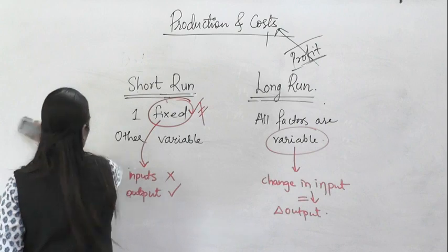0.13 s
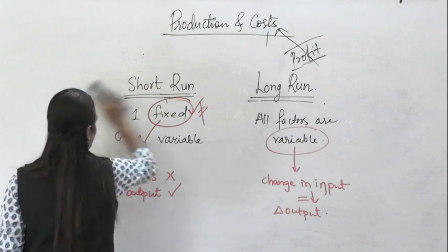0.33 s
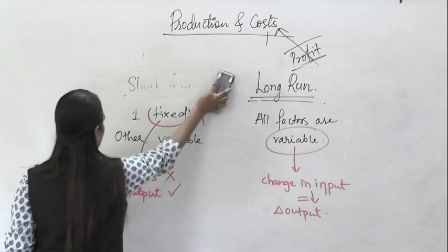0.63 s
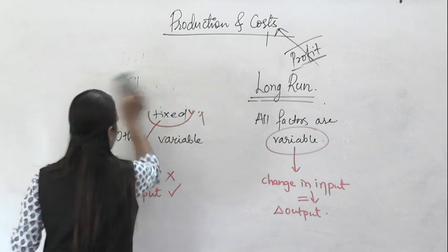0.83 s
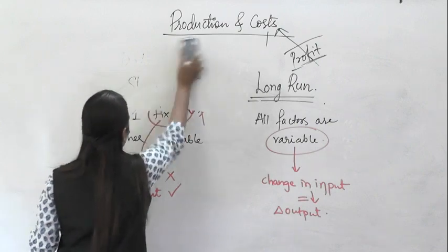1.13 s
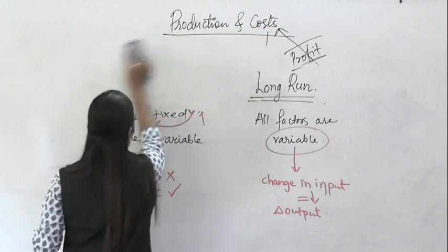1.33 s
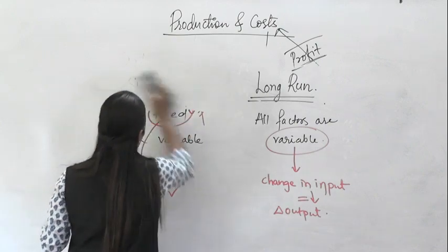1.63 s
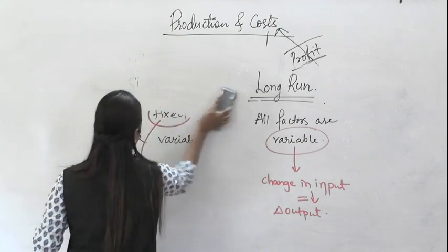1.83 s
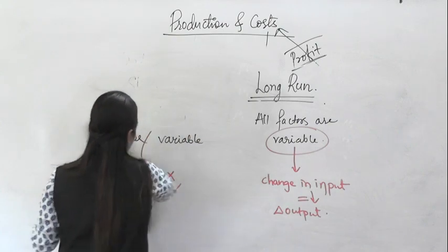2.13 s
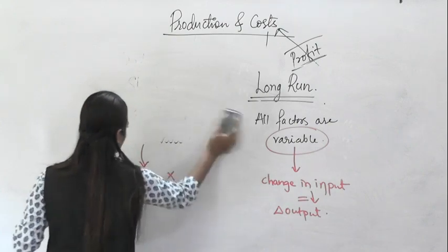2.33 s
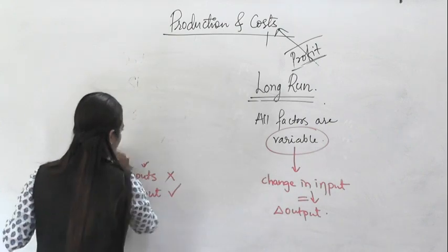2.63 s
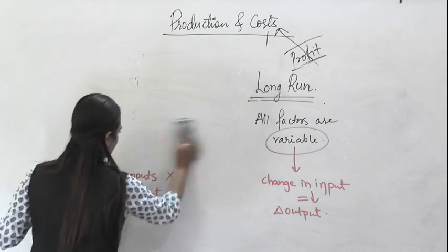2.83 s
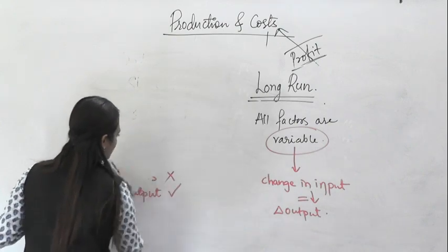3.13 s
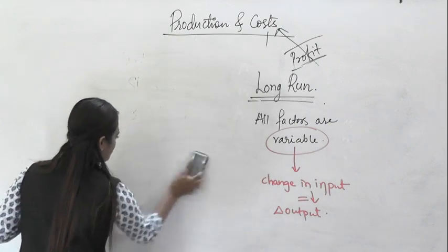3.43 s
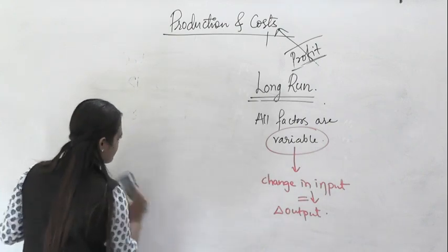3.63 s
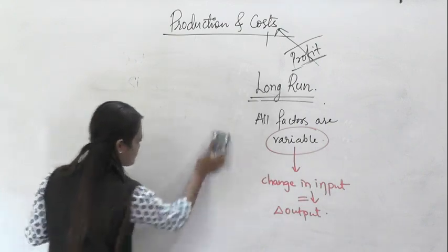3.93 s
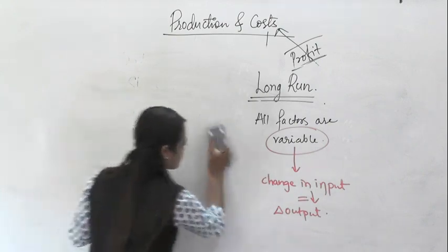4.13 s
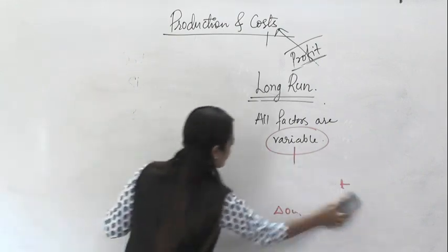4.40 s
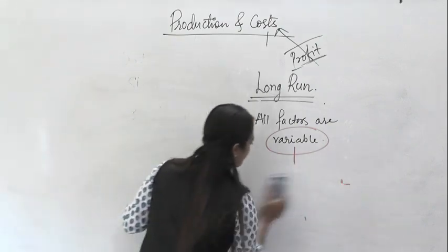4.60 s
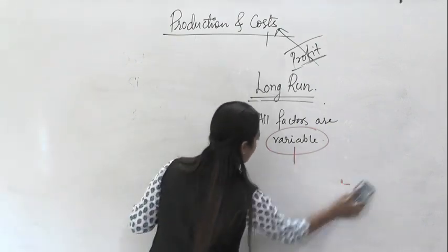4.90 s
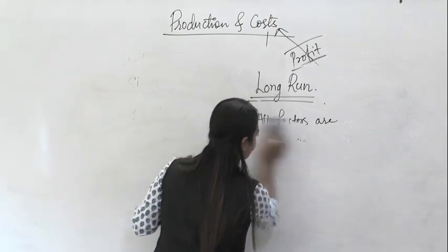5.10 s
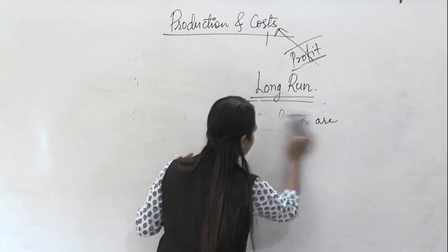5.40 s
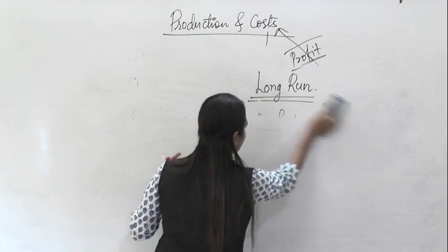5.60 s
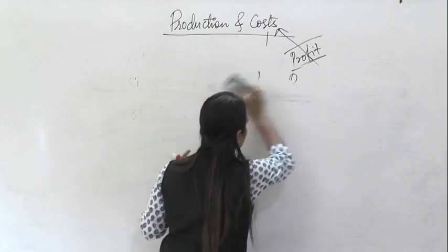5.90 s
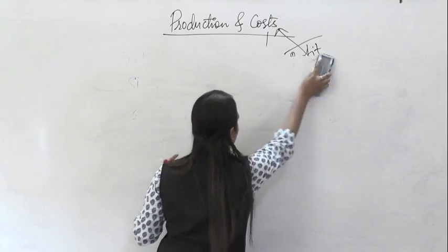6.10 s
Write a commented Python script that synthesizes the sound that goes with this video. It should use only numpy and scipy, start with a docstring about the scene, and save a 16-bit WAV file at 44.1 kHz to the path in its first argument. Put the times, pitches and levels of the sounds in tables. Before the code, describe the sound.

A handheld felt duster rubs a whiteboard in quick, uneven strokes, each a grainy hiss swelling and fading. Early sweeps are broad and airy; later ones become shorter and more hollow, with stronger body resonance, then lighten again. Tiny edge ticks, soft low arm thuds and sleeve rustle come between. A close microphone in a quiet classroom catches a faint room tail; the sound sits almost entirely on the left, with only a dull leak, hiss and faint hum on the right.

```python
"""A felt duster sweeps back and forth over a whiteboard in a quiet classroom, close to a single microphone.
Each stroke is grainy noise shaped by resonances of felt, duster and board that swell and fade with the arm.
Short pitched bursts make the edge's ticks and low swings the arm's soft thuds; a sleeve rustles and rumbles.
A faint room tail and air noise lie behind. The microphone feeds the left input only;
the right input holds a faint dull leak, its own hiss and mains hum."""
import sys
import numpy as np
from scipy import signal
from scipy.fft import rfft, irfft, next_fast_len
from scipy.io import wavfile
from scipy.ndimage import uniform_filter1d, map_coordinates

SR = 44100
rng = np.random.default_rng(int(sys.argv[2]) if len(sys.argv) > 2 else 0)


def voltage_ratio(level):
    """Linear amplitude factor for a level in decibels (scalar or array-like)."""
    return 10 ** (np.asarray(level, float) / 20)


def digitize_waveform(pressure):
    """Quantize a signal to 16-bit integers and store it at the path in sys.argv[1].

    Rows of a 2-D input are taken as channels; values are limited to [-1, 1].
    """
    field = np.atleast_2d(pressure).T
    bounded = np.clip(field, -1, 1)
    quanta = np.round(bounded * 32767).astype(np.int16)
    wavfile.write(sys.argv[1], SR, quanta)


N = 275713  # length in samples


def unit(x):
    """Scaled to rms 1."""
    return x / np.sqrt(np.mean(x ** 2) + 1e-20)


def along(points, hz):
    """Reads (Hz, value) points on a logarithmic frequency axis."""
    f, v = np.transpose(points)
    return np.interp(np.log(hz + 1), np.log(f + 1), v)


def curves(rows, t):
    """Reads each column after the time at times t, in straight lines between rows."""
    s, *cols = np.transpose(rows)
    return [np.interp(t, s, c) for c in cols]


def moments(rows, t, length_s):
    """A short bell at each row's time (rows by times), and the other columns."""
    s, *cols = np.transpose(rows)
    return np.exp(-((t - s[:, None]) / length_s) ** 2), cols


def wobble(rate):
    """A smooth random curve with rate knots a second."""
    knots = rng.standard_normal(int(N * rate / SR) + 4)
    return map_coordinates(knots, [np.arange(N) * rate / SR])


def filtered(x, response):
    """Filters x by a complex response of frequency."""
    m = next_fast_len(N + SR // 2)
    return irfft(rfft(x, m) * response(np.fft.rfftfreq(m, 1 / SR)), m)[..., :N]


def coloured(spectrum):
    """Noise of rms 1 whose spectrum has the given shape."""
    closed = [(1, -120)] + list(spectrum) + [(SR / 2, -120)]
    return unit(filtered(rng.standard_normal(N), lambda hz: voltage_ratio(along(closed, hz))))


def resonance(f, hz, width_hz, steep):
    """Power of a resonance along f, averaging 1; steep sharpens its skirts."""
    power = (1 + ((f * f - hz * hz) / ((f + 1) * width_hz)) ** 2) ** -steep
    return power / np.mean(power, axis=0)


def smooth_noise(shape, bands, frames):
    """Random values smoothed over neighbouring frequency bands and time frames, rms 1."""
    x = uniform_filter1d(rng.standard_normal(shape), size=bands, axis=0)
    return unit(uniform_filter1d(x, size=frames, axis=1))


def rubbing(grit_db=1.0, patchy_db=1.82, ridge_db=0.98):
    """Fibres catch and slip in dense grains; the grains ring five resonances that follow the strokes."""
    grains = unit(rng.standard_normal(N) * voltage_ratio(grit_db * wobble(400) + 0.95 * wobble(45)))
    f, t, z = signal.stft(grains, SR, nperseg=256, noverlap=192)
    f = f[:, None]
    power = felt(f, t) + duster_and_board(f, t)
    # uneven felt and ink: patches of colour come and go
    patches_db = patchy_db * smooth_noise(z.shape, bands=3, frames=40)
    # narrow ridges of resonance last through part of a stroke
    ridges_db = ridge_db * smooth_noise(z.shape, bands=2, frames=120)
    gain = voltage_ratio(ridges_db + patches_db + close_reflection(f, t) + brief_shifts(t)) * np.sqrt(power)
    rubbed = signal.istft(z * gain, SR, nperseg=256, noverlap=192)[1][:N]
    return rubbed * voltage_ratio(catching(np.arange(N) / SR))


# The pushes of the arm. Each row: fastest moment in seconds, rise in seconds, fall in seconds,
# felt hiss level in dB, duster body level in dB.
STROKES = [(0.01, 0.041, 0.15, -36.5, -41.5), (0.258, 0.043, 0.43, -39, -47.5),
           (0.498, 0.32, 0.17, -33.5, -37.5), (0.908, 0.111, 0.091, -33, -35),
           (1.16, 0.26, 0.11, -37.5, -43.5), (1.432, 0.057, 0.13, -29.5, -43),
           (1.735, 0.37, 0.11, -38.5, -42), (2.04, 0.088, 0.11, -25.5, -27.5),
           (2.333, 0.64, 0.12, -41.2, -40.5), (2.652, 0.085, 0.077, -34, -28.5),
           (2.868, 0.12, 0.11, -41, -38.5), (3.155, 0.072, 0.089, -36.5, -27.5),
           (3.388, 0.3, 0.094, -50.5, -40), (3.617, 0.064, 0.073, -41, -31.5),
           (3.859, 0.14, 0.15, -46.5, -38), (4.362, 0.12, 0.16, -39, -43.5),
           (4.585, 0.037, 0.209, -34.5, -34.5), (4.688, 0.09, 0.044, -35, -24.5),
           (4.865, 0.11, 0.13, -34, -37.5), (5.213, 0.13, 0.09, -39.5, -43.5),
           (5.496, 0.22, 0.11, -47, -51.5), (5.782, 0.12, 0.113, -41, -48), (5.97, 0.044, 0.24, -46, -49)]


def stroking(t, peak_db, swing):
    """Power over time: every stroke swells to its peak and dies away, more steeply with a larger swing."""
    roundness = 1.656  # with swing 1 the level is 20 dB down one rise before or one fall after the peak
    s, rise, fall = np.transpose(STROKES)[:3, :, None]
    away = np.where(t < s, (s - t) / rise, (t - s) / fall) ** roundness
    return np.sum(voltage_ratio(2 * (peak_db[:, None] - 20 * swing * away)), axis=0)


# The felt's colour drifts with place and tilt. Each row: time in seconds, hiss centre in Hz,
# fibre sizzle centre in Hz, sizzle level in dB relative to the hiss.
FELT = [(0, 5700, 9800, -17), (.5, 5460, 10000, -13), (.75, 5600, 9800, -6), (.9, 6100, 9800, -16),
        (1.16, 5970, 9800, -9), (1.32, 5970, 9900, -6), (1.44, 5500, 10300, -17), (1.72, 6140, 10300, -9),
        (2.04, 5330, 9500, -17), (2.17, 5300, 9500, -12), (2.33, 5860, 10000, -1.5),
        (2.65, 5800, 10000, -11), (2.87, 5300, 10100, -3.5), (3.16, 5600, 9400, -5.5),
        (3.26, 5400, 9800, 4), (3.36, 7540, 9900, 9.5), (3.47, 5600, 9800, 1), (3.62, 6200, 9600, -1),
        (3.7, 7400, 9400, 13), (3.77, 7600, 9300, 16), (3.86, 7100, 8800, 3), (4, 6500, 10000, 5),
        (4.36, 6160, 9600, -2.5), (4.58, 5870, 10400, -14), (4.66, 6200, 10300, -24),
        (4.76, 5900, 11500, -6), (4.87, 6250, 12300, -15), (5.21, 6560, 9400, -5), (5.3, 5840, 9800, -8),
        (5.4, 7050, 9800, 2.5), (5.52, 6960, 9800, -7.5), (5.66, 5840, 9800, -4), (5.78, 5800, 9600, -11),
        (6.25, 5400, 9900, -10)]


def felt(f, t):
    """Rubbed felt gives a broad hiss and a higher, wider fibre sizzle, as power by frequency and time."""
    hiss_peak_db = np.transpose(STROKES)[3]
    hiss_hz, sizzle_hz, sizzle_db = curves(FELT, t)
    hiss = stroking(t, hiss_peak_db, swing=1) * resonance(f, hiss_hz, width_hz=3940, steep=2.64)
    sizzle = voltage_ratio(2 * sizzle_db) * stroking(t, hiss_peak_db, swing=1.19)
    return hiss + sizzle * resonance(f, sizzle_hz, width_hz=8600, steep=2.8)


# Grip and pressure detune the duster. Each row: time in seconds, body pitch in Hz, body width
# as a multiple of the usual width, upper mode pitch in Hz, upper mode level in dB relative
# to the hiss, board level in dB.
BODY = [(0, 2300, 1.2, 3900, 2.5, -47.5), (.28, 2200, 1.3, 3600, -4, -49.5),
        (.52, 2100, 1.76, 3900, -29, -49), (.73, 1970, 1.2, 3700, -13, -48.5),
        (.91, 2060, 0.73, 4240, -3.5, -45.5), (1.16, 2470, 2.6, 3650, -16, -44),
        (1.31, 2060, 2.8, 3480, -3, -47.5), (1.44, 2300, 1.4, 3670, -3.5, -40.5),
        (1.72, 2520, 2.3, 3720, -6.5, -45.5), (2.04, 2400, 0.41, 3790, 7.5, -45),
        (2.33, 2330, 2, 3800, -2, -43), (2.65, 2210, 0.81, 4000, 0, -46),
        (2.87, 2180, 1.14, 3440, -0.5, -45), (3.16, 2160, 0.77, 4300, 0, -44),
        (3.27, 2160, 0.7, 3500, 2, -45.5), (3.39, 2180, 0.62, 3380, 9.5, -39),
        (3.62, 2210, .72, 3200, -2.5, -41.5), (3.74, 2000, 0.87, 3100, 2, -44.5),
        (3.9, 2290, 1.24, 3300, -12, -45.5), (4.09, 2350, 1.5, 3500, 15.5, -38),
        (4.22, 2000, 1.9, 3650, -7, -39), (4.36, 2260, 1.5, 4000, -4, -43),
        (4.66, 2180, 0.82, 3800, -4, -41), (4.87, 2210, 0.97, 4240, -17.5, -51),
        (5.05, 2190, 2.7, 3820, 5.5, -49), (5.2, 2440, 1.1, 4070, -4.5, -43),
        (5.35, 2250, 0.82, 3960, 2, -43.5), (5.5, 2390, 0.41, 3700, 5, -40),
        (5.63, 2500, 1.3, 3480, 10.5, -44.5), (5.78, 2460, 0.64, 4050, -4, -47.5),
        (6.0, 2350, 2.2, 3640, 0.5, -41), (6.25, 2100, 1.1, 3500, -0.5, -44)]
# The board's steady resonance: pitch in Hz, width in Hz.
BOARD = (1383, 910)
# The hand bears down for a moment, so body and board ring louder. Each row: time in seconds,
# added body level in dB, added board level in dB.
PRESSES = [(.36, -59, -45.5), (.46, -49, -45.5), (.9, -42, -50), (1.44, -30, -65), (1.63, -57, -40),
           (1.92, -48, -40.5), (2.05, -30, -47), (2.14, -57, -40), (2.4, -39.5, -57), (2.93, -41.5, -57),
           (3.199, -29.5, -64), (3.42, -38, -56), (3.62, -29.5, -46), (3.97, -39, -46.5),
           (4.08, -48.5, -64), (4.27, -68, -48), (4.37, -36.5, -41), (4.68, -31, -37), (4.89, -36.5, -37),
           (5.14, -39, -47), (5.2, -40, -42), (5.481, -37.5, -44), (5.77, -42.5, -52), (5.98, -60, -48)]


def duster_and_board(f, t):
    """The duster's body, its upper mode and the board ring at their pitches, as power by frequency and time."""
    usual_width_hz, press_s = 1056, 0.028
    board_follows = 0.29  # share of the body's stroke-to-stroke level differences that reaches the board
    hiss_peak_db, body_peak_db = np.transpose(STROKES)[3:]
    body_hz, width, upper_hz, upper_db, board_db = curves(BODY, t)
    press, (press_body_db, press_board_db) = moments(PRESSES, t, press_s)
    body = stroking(t, body_peak_db, swing=0.68) + voltage_ratio(2 * press_body_db) @ press
    board_peak_db = board_follows * (body_peak_db - body_peak_db.mean())
    board = voltage_ratio(2 * board_db) * stroking(t, board_peak_db, swing=0.34)
    board = board + voltage_ratio(2 * press_board_db) @ press
    upper = voltage_ratio(2 * upper_db) * stroking(t, hiss_peak_db, swing=0.8)
    return (body * resonance(f, body_hz, width * usual_width_hz, steep=2.75)
            + board * resonance(f, *BOARD, steep=3.6)
            + upper * resonance(f, upper_hz, width_hz=2980, steep=3.1))


# A close reflection colours the rubbing. Each row: time in seconds, pitch of the change in Hz,
# level change there in dB (below zero hollows out, above zero lifts).
REFLECTION = [(0, 3020, -7), (.3, 3830, -1.5), (.6, 3770, 1), (.73, 3800, -5), (.85, 3730, -1),
              (1.2, 4200, 0), (1.32, 4500, -6), (1.42, 3820, -2), (1.7, 3900, -5), (2.05, 4060, -0.5),
              (3.15, 3950, 0), (3.3, 4080, -11), (3.45, 4200, -1), (3.62, 4000, -3), (3.72, 4250, -16),
              (3.85, 4400, -13), (4.02, 5400, -5), (4.2, 5000, 4), (4.37, 3150, -5.5), (4.6, 3000, -5.5),
              (4.7, 3060, -7), (4.8, 3150, -20), (4.95, 3130, -10), (5.0, 2600, -2), (5.06, 2350, -12),
              (5.13, 2360, -1), (5.35, 2080, -3), (5.63, 1970, -2), (5.78, 1960, 1), (6.25, 2100, -14)]


def close_reflection(f, t):
    """A close reflection hollows or lifts the rubbing around one pitch, and less near three times that pitch."""
    centre_hz, change_db = curves(REFLECTION, t)
    lower = np.exp(-((f - centre_hz) / (0.093 * centre_hz)) ** 2)
    upper = np.exp(-((f - 3.14 * centre_hz) / (0.28 * centre_hz)) ** 2)
    return change_db * (lower + 0.48 * upper)


# Brief shifts in level between strokes. Each row: time in seconds, level change in dB
# (below zero is quieter).
SHIFTS = [(.18, -0.5), (.75, 2), (1.0, 0), (1.32, -0.5), (1.87, -3.5), (2.2, -3), (2.5, 9.5), (3.52, 2),
          (5.05, 4.5), (5.35, -2.5), (5.62, 1)]


def brief_shifts(t):
    """Level change in dB: the rubbing dips or lifts briefly at some listed moments between strokes."""
    shift, (change_db,) = moments(SHIFTS, t, length_s=0.015)
    return change_db @ shift


# The felt sticks, then breaks free. Each row: time in seconds, jump in level in dB
# (below zero the level falls instead).
CATCHES = [(1.412, -3), (1.965, 2.5), (2.58, -6), (3.098, 10), (3.267, 12), (3.591, 3), (4.348, 0),
           (4.565, 6.5), (4.813, 9), (5.13, 1), (5.461, -3), (5.951, 0)]


def catching(t, stick_s=0.01, slip_s=0.0095):
    """Level change in dB: half of each jump builds up while the felt sticks, half fades after it slips."""
    s, jump_db = np.transpose(CATCHES)[..., None]
    after = t - s
    sticking = -np.exp(np.minimum(after, 0) / stick_s)
    slipping = np.exp(-np.maximum(after, 0) / slip_s)
    return np.sum(jump_db / 2 * np.where(after < 0, sticking, slipping), axis=0)


# Ticks of the duster's edge. Each row: middle in seconds, peak in dB, pitch in Hz,
# length in milliseconds (standard deviation of the bell).
TICKS = [(.5435, -25, 5500, .3), (1.4128, -11, 2800, .09), (1.4128, -14, 11000, .03),
         (1.415, -18, 3500, .08), (1.5708, -23, 4500, .15), (1.9133, -29, 5500, .4), (1.9324, -27, 500, .4),
         (3.1005, -20, 2000, .6), (3.2682, -23, 1850, .4), (3.9615, -33, 8000, .04), (4.349, -21, 1700, .4),
         (4.5202, -27, 2000, .35), (4.565, -23, 1700, .8), (5.542, -26, 3500, .12), (5.544, -30, 1350, 1.2),
         (5.574, -34, 3400, 1.3), (5.9522, -28, 5000, .045), (5.9532, -26, 1500, .5)]


def edge_ticks():
    """The duster's edge ticks on the board: each tick is a very brief bell-shaped burst at one pitch."""
    out = np.zeros(N + SR)
    near = np.arange(-300, 300) / SR
    for s, db, hz, ms in TICKS:
        window = np.exp(-.5 * (near * 1000 / ms) ** 2)
        burst = window * np.cos(2 * np.pi * hz * near)
        # a small edge radiates no bass: the burst averages to zero
        burst = burst - window * burst.sum() / window.sum()
        out[round(s * SR) - 300:][:len(near)] += voltage_ratio(db) * burst / burst.max()
    return out[:N]


# Soft knocks of the arm. Each row: start in seconds, level in dB, pitch in Hz, length in seconds
# (both the wait for the bell's top and its standard deviation).
THUDS = [(1.3005, -35, 75, .006), (1.93, -40, 70, .005), (4.345, -47, 70, .007), (5.545, -44, 85, .01),
         (6.085, -48, 70, .007)]


def arm_thuds():
    """The arm knocks softly: each thud is a low push and rebound through the board."""
    out, t = np.zeros(N + SR), np.arange(SR // 5) / SR
    for s, db, hz, length in THUDS:
        bell = np.exp(-.5 * (t / length - 1) ** 2)
        out[round(s * SR):][:len(t)] -= voltage_ratio(db) * bell * np.sin(2 * np.pi * hz * t)
    return out[:N]


# Sleeve and arm, steady part. Each row: time in seconds, rustle level in dB, rumble level in dB.
STEADY_SLEEVE = [(0, -54, -54), (.15, -53.5, -57), (.4, -57.5, -67), (1, -56.5, -62), (1.25, -52.5, -59),
                 (1.8, -53, -62.5), (2.2, -57.5, -62), (3.2, -55.5, -65.5), (4.1, -52.5, -63.5),
                 (4.25, -47.5, -58), (4.85, -48.5, -63), (5.3, -48, -57.5), (5.5, -48, -56.5),
                 (5.85, -53.5, -62), (6.25, -52.5, -60)]
# The sleeve brushes past. Each row: time in seconds, rustle rise in dB, rumble rise in dB
# (below zero is quieter).
BRUSHES = [(.68, 3.5, 12), (1.44, 6.5, 9.5), (1.88, -6, 5), (1.95, 10.5, 10), (2.5, 5, 6), (2.7, 4, 8),
           (4.21, 4.5, -1), (4.351, 3.5, 7), (4.53, 0, 8.5), (4.71, 7, 10), (5.08, 0.5, -2.5),
           (5.54, 4.5, 9), (5.97, 5, 1), (6.08, 1.5, 4)]
# Colours of the rustle and of the rumble. Each row: frequency in Hz, relative level in dB per Hz.
RUSTLE = [(120, -29.5), (200, 0.5), (274, -0.5), (372, -0.5), (568, -2), (681, -1), (1000, 0.5), (1300, -9),
          (2200, -120)]
RUMBLE = [(12, -34), (20, 2.5), (70, -3), (102, 3.5), (152, -1.5), (217, -2), (260, -14.5), (340, -4),
          (570, -120)]


def sleeve():
    """The moving arm rustles and rumbles in lumps of noise that change for a moment at each brush."""
    t = np.arange(N) / SR
    rustle_db, rumble_db = curves(STEADY_SLEEVE, t)
    brush, (rustle_rise_db, rumble_rise_db) = moments(BRUSHES, t, length_s=0.038)
    rustle_db = rustle_db + rustle_rise_db @ brush + 0.9 * wobble(30) + 0.4 * wobble(7)
    rumble_db = rumble_db + rumble_rise_db @ brush + 2.4 * wobble(11)
    return voltage_ratio(rustle_db) * coloured(RUSTLE) + voltage_ratio(rumble_db) * coloured(RUMBLE)


# How long the room rings. Each row: frequency in Hz, time to die by 60 dB in seconds.
ROOM = [(300, 0.32), (2000, 0.53), (12000, 0.18)]


def classroom(x):
    """The room answers with a noise tail in which each frequency dies at its own speed."""
    hz, t, z = signal.stft(rng.standard_normal(SR // 2), SR, nperseg=256)
    tail = signal.istft(z * voltage_ratio(-60 * t / along(ROOM, hz)[:, None]), SR, nperseg=256)[1]
    late = np.pad(x, (400, 0))  # the answer starts 400 samples late
    return signal.fftconvolve(late, tail / np.linalg.norm(tail))[:N]


# Colour of the room air. Each row: frequency in Hz, relative level in dB per Hz.
AIR = [(590, -26), (1000, 0.5), (1480, -1), (1970, -23), (2460, -12), (4220, -4), (7100, -34), (15700, -49)]


def room_air():
    """The quiet room's air is a faint steady coloured noise."""
    return voltage_ratio(-61) * coloured(AIR)


def scene():
    """One microphone hears board, arm, room and air; both rows hold the same sound."""
    board = rubbing() + edge_ticks() + arm_thuds()
    heard = board + voltage_ratio(-18) * classroom(board) + sleeve() + room_air()
    return np.array([heard, heard])


# Colour of the microphone capsule. Each row: frequency in Hz, level in dB.
MIC = [(20, -1.5), (9000, 0), (12000, -5), (16000, -4.5)]


def left_input(heard):
    """The left input amplifies the microphone, whose capsule colours the sound."""
    return voltage_ratio(6.0) * filtered(heard, lambda f: voltage_ratio(along(MIC, f)))


# Colour of the right input's hiss. Each row: frequency in Hz, relative level in dB per Hz.
INPUT_HISS = [(30, 9), (300, -21), (3000, -19), (15000, 12)]


def right_input(left, leak_db=-27, leak_hz=210, lag_s=6e-5):
    """The idle right input picks up a low-passed, slightly late leak of the left, with hiss and mains hum."""
    def leaking(f):
        """A gentle low-pass with a short delay."""
        return voltage_ratio(leak_db) / (1 + 1j * f / leak_hz) * np.exp(-2j * np.pi * f * lag_s)

    hum = voltage_ratio(-88) * np.sin(2 * np.pi * 50 * np.arange(N) / SR)
    return filtered(left, leaking) + voltage_ratio(-86) * coloured(INPUT_HISS) + hum


def low_pass(x):
    """Removes everything above the highest recorded frequency."""
    return signal.sosfilt(signal.butter(12, 15870, fs=SR, output="sos"), x)


def record(dry):
    """The microphone feeds the left input; the right input has no microphone of its own."""
    left = left_input(dry[0])
    mix = np.array([left, right_input(left)])
    return low_pass(mix)


dry = scene()
out = record(dry)
digitize_waveform(out)
```